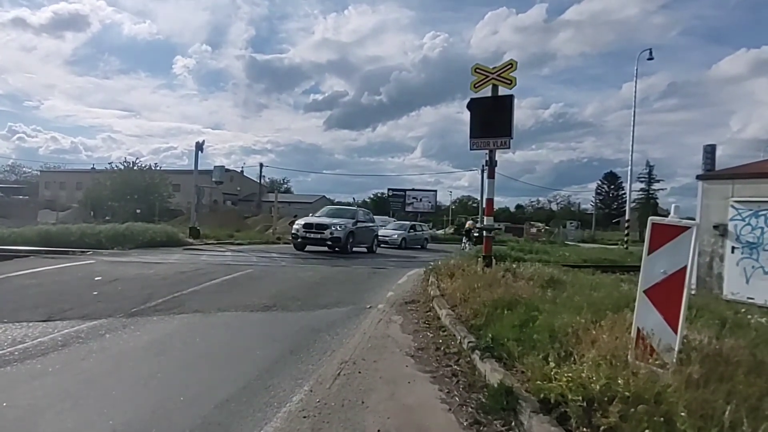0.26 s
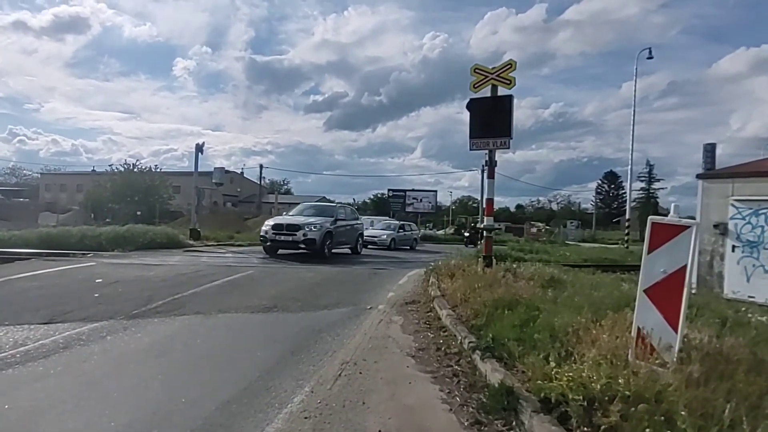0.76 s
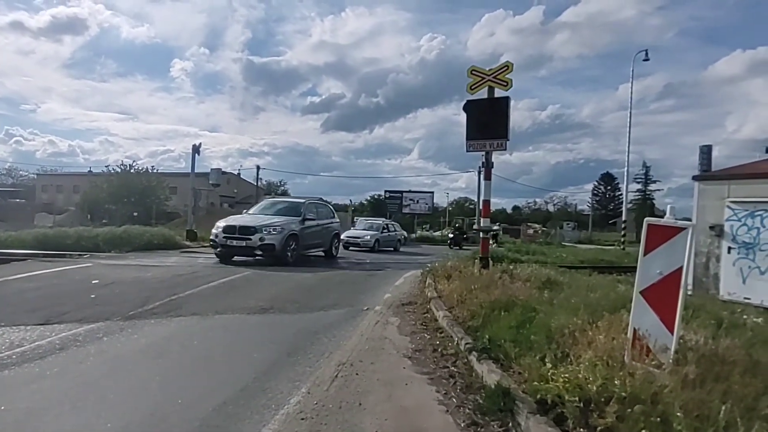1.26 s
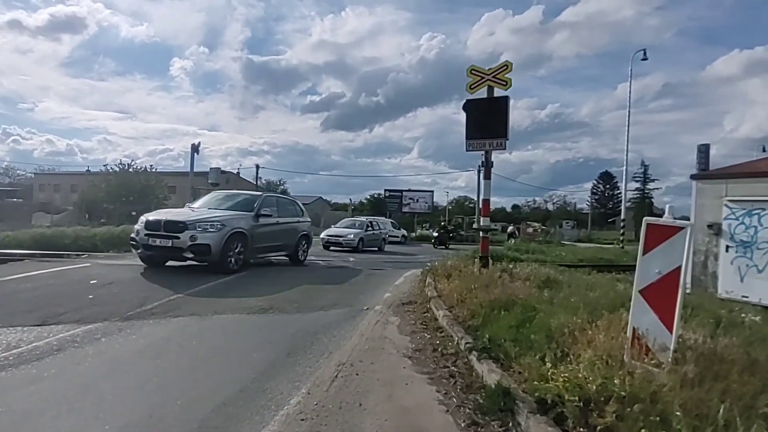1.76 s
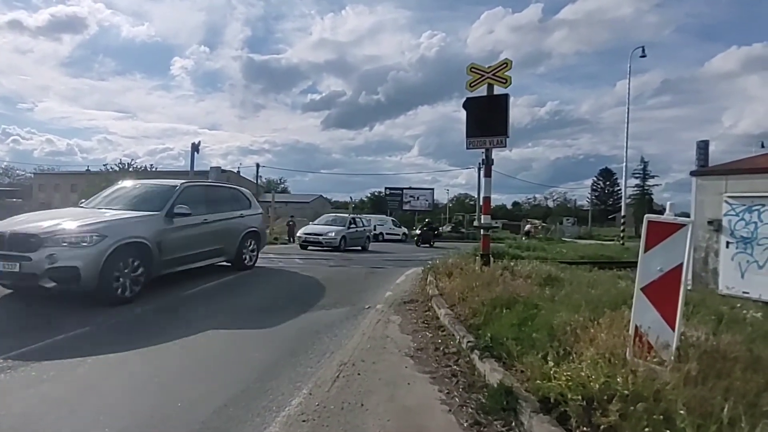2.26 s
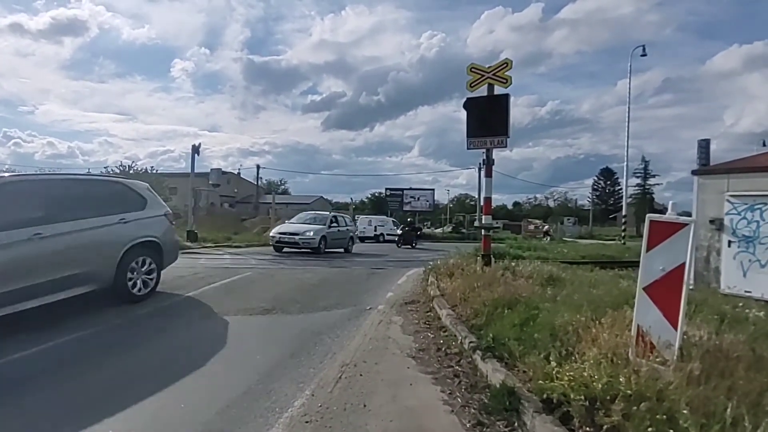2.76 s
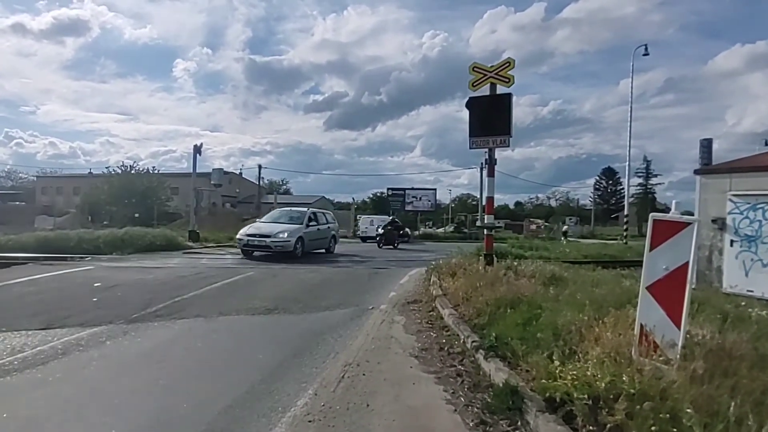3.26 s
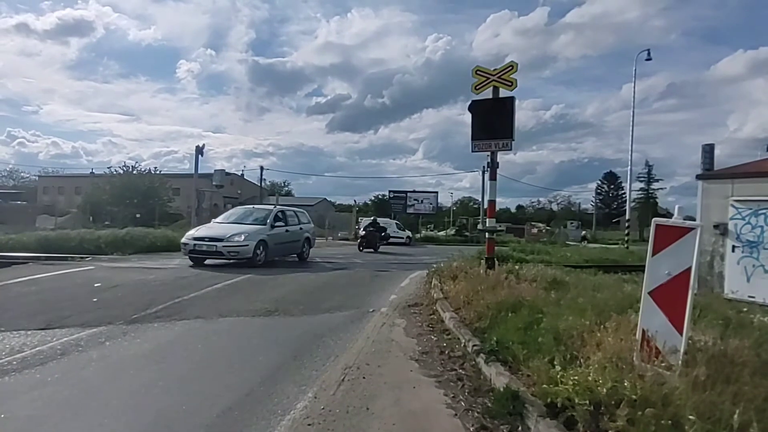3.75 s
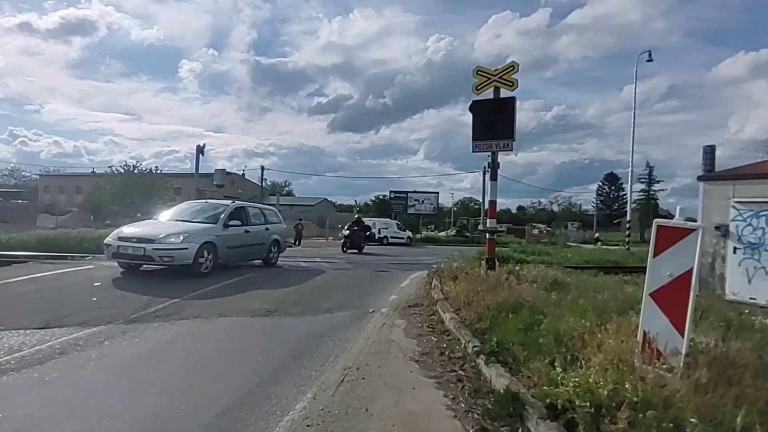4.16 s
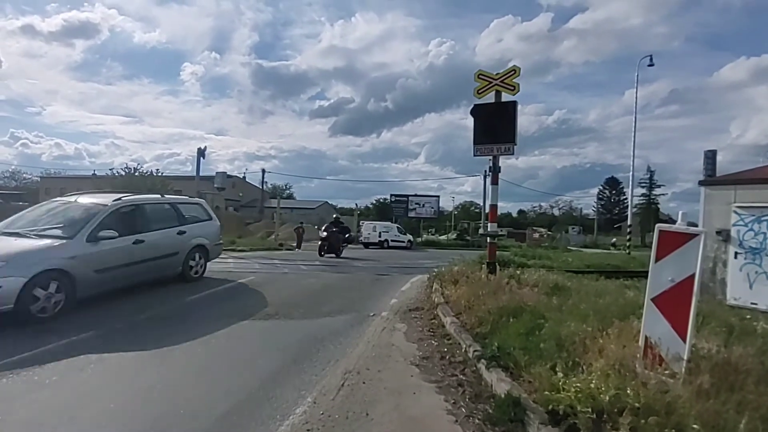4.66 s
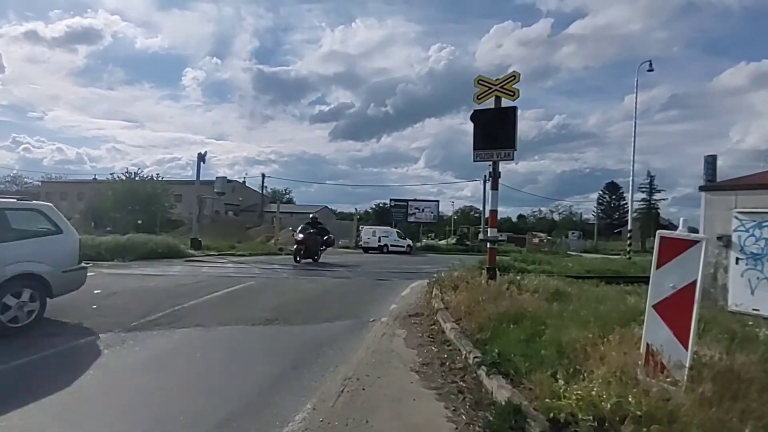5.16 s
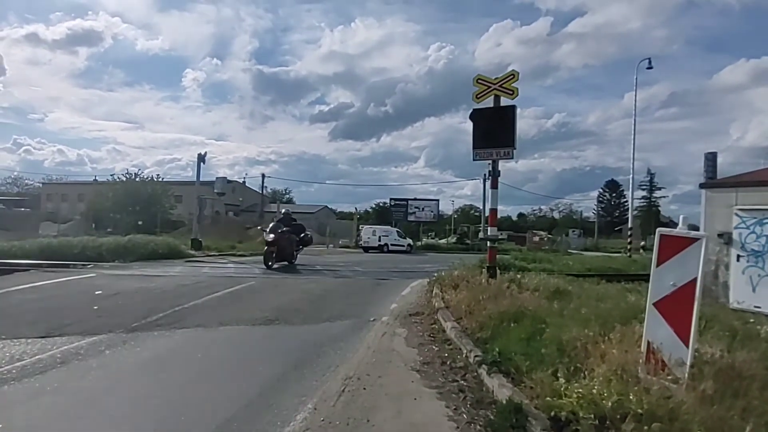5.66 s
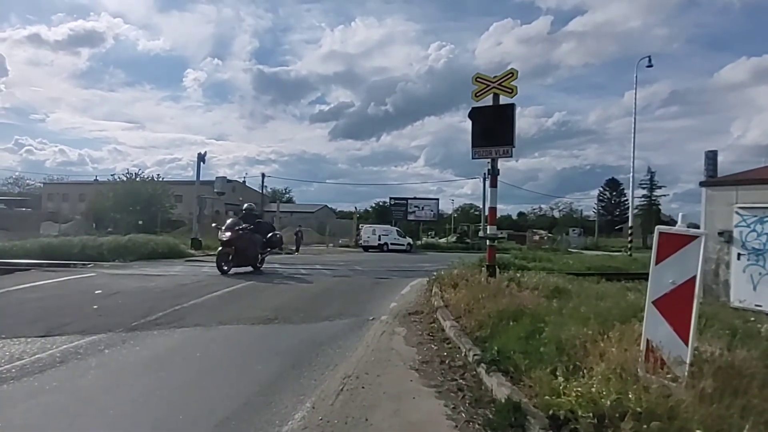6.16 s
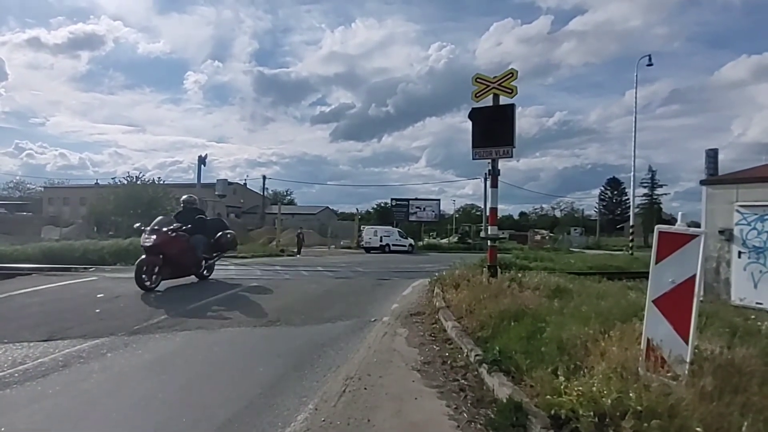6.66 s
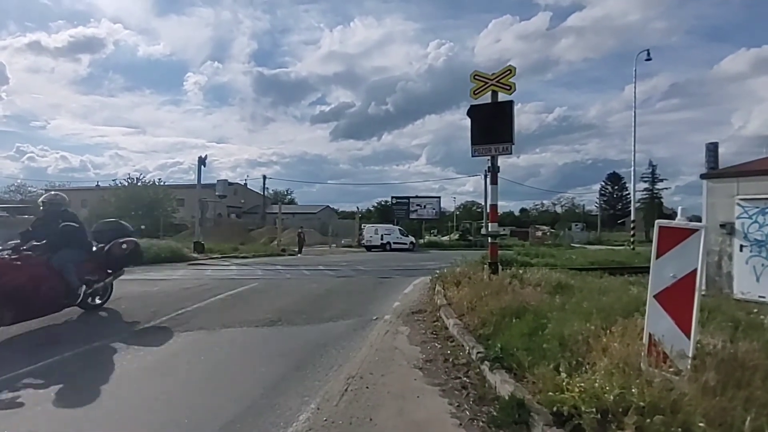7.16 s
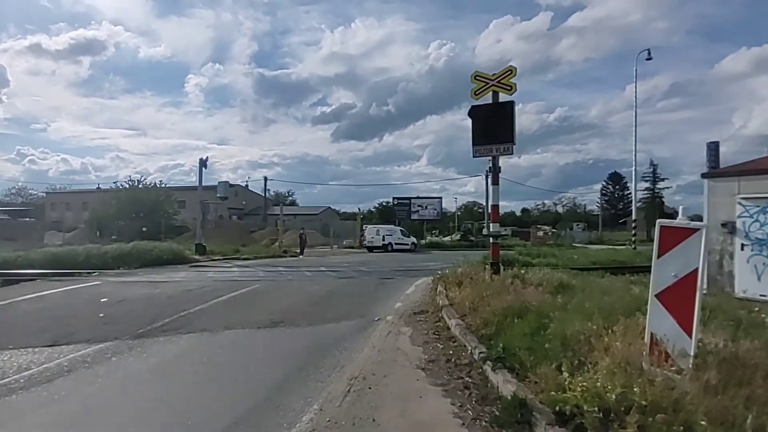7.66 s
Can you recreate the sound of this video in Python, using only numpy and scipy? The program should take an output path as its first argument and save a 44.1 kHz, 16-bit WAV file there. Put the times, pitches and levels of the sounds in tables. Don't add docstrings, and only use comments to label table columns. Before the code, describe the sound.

At an outdoor roadside, two cars then a motorcycle sweep past with rushing tyres, low rumble, rising engine drone and short wheel thumps.

```python
import sys
import numpy as np
from scipy import signal
from scipy.io import wavfile
from scipy.ndimage import uniform_filter1d, map_coordinates

SR = 44100
rng = np.random.default_rng(int(sys.argv[2]) if len(sys.argv) > 2 else 0)


def file_out(sig):
    cols = np.atleast_2d(sig).T
    lim = np.clip(cols, -1, 1)
    pcm = np.round(lim * 32767).astype(np.int16)
    wavfile.write(sys.argv[1], SR, pcm)


def elevation(decibels):
    levels = np.asarray(decibels, float)
    return 10 ** (levels / 20)


N = 347949

# time in seconds, level in dB,
# bearing (0 far ahead, 1 nearing, 2 abreast, 3 low on the left).
CAR_ONE_TYRES = [(0, -45, 0.29), (1, -40, 0.042), (1.7, -33.5, 0.49), (3.05, -30.5, 1.09),
                 (3.4, -30.5, 1.87), (3.8, -30, 1.84), (4.7, -33, 2.05), (5.1, -34.5, 1.95),
                 (5.9, -57, 2.1)]
CAR_TWO_TYRES = [(3.4, -56, .35), (4, -39.5, 0.34), (4.4, -32.5, 0.75), (5.1, -33.5, 1.26),
                 (5.5, -31, 1.93), (6.05, -30.5, 1.99), (6.68, -34.5, 1.75), (6.76, -35, 0.51),
                 (7.2, -43, 0.78)]
BIKE_TYRES = [(5.8, -50, 3), (6.3, -40.5, 2.76), (6.7, -35, 2.35), (7.05, -35, 2.86), (7.35, -35, 3),
              (7.65, -34, 2.84), (7.89, -36, 4.2)]
# time the lobe starts to climb in seconds, lobe in dB, treble in dB,
# rumble over the tyres in dB, deep rumble in dB.
VEHICLE_TRAITS = [
    (1.72, 3, -2.5, -1, -2),
    (3.7, 4.5, 2.5, 0.5, -1.5),
    (6.55, 8.5, -3.5, 2, 6),
]
LOBE_WIDTHS = [.16, .18, .1]
SHADOW_DEPTHS_DB = [2, 2, 7]
# vehicle number from 0, time in seconds, width in seconds, treble in dB.
TREAD_FLARES = [
    (0, 3.7, 0.16, 3.5),
    (0, 4.65, 0.24, 4),
    (1, 6.03, .11, 6.5),
]
# bearing, centre in Hz, depth in dB.
GROUND_DIP = [(0, 630, 6), (.5, 670, 13.5), (.8, 708, 10), (1, 751, 4), (2, 740, 2), (3, 711, -0.5)]

# frequency in Hz, left in dB,
# right in dB, extra phase in radians, likeness from 0 to 1.
AHEAD_BODY = [(440, 11.5, 12, 2, 0.99), (630, -3, 2.5, 1, 1), (800, 11, 10.5, -2.5, 0.84),
              (1130, 5.5, 9.5, -1.7, 0.99), (1290, -1, 6.5, -1.9, 0.63), (1530, 11.5, 6.5, -2, 0.98),
              (1790, -4.5, -1, -2, 0.17), (2010, -2, -2, -1, 0.53), (2340, -8, -14, -2.3, 0.81),
              (2520, -5.5, -6, 1.5, .3), (2840, 1, 3, 1, 0.96), (3140, 3, -3.5, 0.8, 1),
              (3430, -12, -37, 3.5, .3), (3780, -26, -28.5, 0.5, .15)]
NEARING_BODY = [(246, 18.5, 15.5, -.4, 0.99), (475, 9, 11.5, 0.5, 0.93), (696, 3.5, 9.5, 0.5, 0.93),
                (875, 8, 4, -1.25, 0.82), (1145, 4.5, 10, -1.04, 1), (1540, 0.5, 6.5, 0, 0.98),
                (1830, 2.5, 2, -3.2, 0.48), (1990, -6, 7.5, 1.2, 0.11), (2360, -4, 0.5, -5, 0.67),
                (2920, -4, -7.5, 2, 0.4), (3116, -3, -5, 2.5, 0.4), (3610, -14, -24, 11.5, 0.22),
                (4170, -21, -16.5, -1.5, 0.27), (5050, -31.1, -21, 5, 0.08)]
ABREAST_BODY = [(248, 11.5, 8, 0.25, 0.65), (443, 9.5, 10, -0.097, 0.9), (670, 8.5, 9, 0.046, 0.8),
                (910, 7.5, 10, -0.77, 0.9), (1120, 5.5, 10, -0.57, 0.5), (1530, 4.5, 5, 0.54, 0.45),
                (1830, 6.5, 6, 0.35, 0.99), (1950, 0.5, 1.5, -0.39, 0.54), (2340, -2, 7.5, -0.094, 0.37),
                (2750, 4.5, 4.5, 0.49, 0.99), (3060, 10, 3, 1, 0.81), (3530, -3.5, 2.5, -0.87, 0.42),
                (4020, -7.5, -7.5, -0.29, 0.81), (4860, -56, -21, -1.4, 0.1)]
LEFT_BODY = [(250.0, 18.5, 16, -0.26, 0.99), (462, 13.5, 15.5, -1, 0.81), (680, 2, 3, 0.26, 0.47),
             (940, 10, 6.5, -0.05, 0.94), (1154, 5.5, 7.5, -0.3, 0.35), (1560, 4, -1, 0.96, 1),
             (1820, 1.5, -2, 1.3, 0.52), (2090, -4, 1, -0.43, 0.46), (2384, 0, -3, -0.29, 0.38),
             (2800.0, 0.5, -5.5, 2.4, 0.28), (3330, 0.5, -8.2, 1.1, 0.2), (3520, -5.5, -22, -1, 0.205),
             (4400, -15.5, -21, -0.73, 0.45), (5000.0, -23, -28.4, -0.85, 0.14)]
# frequency in Hz, left in dB, right in dB.
AHEAD_TREBLE = [(4500.0, -23, -23), (5500.0, -32, -28), (6500.0, -33, -23), (8100, -32, -33),
                (9700.0, -44, -33), (11500.0, -34, -34), (13500.0, -35.1, -39), (15400.0, -34, -34)]
NEARING_TREBLE = [(4500.0, -22.9, -20.5), (5400, -30, -22.5), (6660, -28.5, -29.5), (8700, -22.5, -27.5),
                  (9400, -37, -31), (11500.0, -28, -30), (13500.0, -28, -34), (15400.0, -33, -31)]
ABREAST_TREBLE = [(4400, -23.8, -14), (5360, -56, -21), (6630, -43.5, -22), (8350, -32, -24.5),
                  (9700.0, -55, -24), (11900, -37, -28.5), (13500.0, -30.0, -30), (15400.0, -40.3, -27.0)]
LEFT_TREBLE = [(4530, -16, -24), (5400, -23, -34), (6500.0, -17.5, -28), (8270, -15, -38), (9500, -25, -38),
               (11700, -20, -43), (13500.0, -19, -40), (15400.0, -20, -40.6)]

# frequency in Hz, density in dB per Hz.
RUMBLE_COLOUR = [(20, -42), (40, -17), (55, -5), (80, 17), (130, 12), (220, 15.5), (300, 12), (420, -53.5)]

# time in seconds, firing rate in Hz, level in dB rms.
CAR_ONE_ENGINE = [(0, 84.6, -42), (.25, 81.2, -39), (.5, 75.2, -55), (.8, 82.25, -41), (1.5, 93.23, -38),
                  (1.9, 97.8, -39.5), (2.4, 99.5, -42.5), (4, 100.6, -52), (4.6, 102.5, -62)]
CAR_TWO_ENGINE = [(2.8, 51.9, -55), (3.65, 61.4, -47), (4.2, 68.17, -35.5), (4.5, 69.65, -36),
                  (5.13, 74.8, -29), (5.4, 80.15, -32), (6, 82, -37), (6.3, 80.7, -37.5), (6.6, 81.6, -48)]
BIKE_ENGINE = [(4.2, 45.47, -44), (5.3, 47.38, -33), (6, 49.9, -30), (6.55, 53.58, -27.5), (7.0, 58.2, -26),
               (7.42, 62.2, -27), (7.52, 62.8, -32.5), (7.63, 68.63, -25.5), (7.89, 66.2, -25)]
FOLLOWING_ENGINE = [(6.9, 80, -63), (7.15, 83.2, -32), (7.35, 82.7, -24), (7.5, 81.3, -28),
                    (7.65, 84.4, -23.5), (7.8, 88.9, -24.5), (7.89, 86.6, -20)]
CAR_ONE_GEARBOX = [(2.5, 95.6, -65.5), (2.8, 96.9, -51), (2.95, 97, -47), (3.15, 101.4, -40.5),
                   (3.3, 100.8, -40.5), (3.5, 97.6, -48.5), (3.72, 93.7, -46.5), (3.85, 93, -67)]
# multiple of the firing rate, level over the engine in dB,
# growth in dB per octave of revs.
CAR_ONE_ORDERS = [(1, -2, 3), (2, -7, 43)]
CAR_TWO_ORDERS = [(1, -1, 21), (2, -2, -2), (3, -4.5, -26.5), (4, -9.5, -4), (5, -25.5, -39), (6, -15, -22)]
BIKE_ORDERS = [(1, -11.5, 48), (2, -3, -12), (2.985, -19.5, 59), (4.017, -11, -18), (4.999, -18.5, -12),
               (8.02, -24, 3), (28, -23.5, 20)]
GEARBOX_ORDERS = [(4, -4, 0), (5.8, 0.5, 0), (6.25, -4, 0), (6.6, 0.5, 1)]
# centre in Hz, width in log Hz, gain in dB.
CAR_TWO_PIPE = [(394.4, 0.051, 17.6)]
BIKE_PIPE = [(114, 0.11, 3.4), (224, 0.088, 5.1), (261.3, 0.023, 8.9), (470.5, 0.037, 12.4)]

# time in seconds, peak in dB, pitch in Hz, 60 dB decay in seconds.
WHEEL_THUDS = [
    (.281, -22.5, 114, 0.1),
    (1.08, -28.5, 890, .01),
    (2.271, -15, 900, 0.011),
    (3.999, -12.5, 940, 0.017),
    (4.39, -22, 500, 0.012),
    (6.864, -15, 390, 0.04),
]
# line in Hz, level in dB rms.
VAN_IDLE = [(165, -51.5), (207, -54)]
# start in seconds, end in seconds, first pitch in Hz, last pitch in Hz, level in dB.
BIRD_PEEP = (0.118, 0.146, 5800, 6800, -74)
# time in seconds, peak in dB.
HANDLING_TICKS = [(.095, -58), (.402, -58)]

HOP, WIN = 256, 1024
LOBE_LOW_HZ, LOBE_HIGH_HZ, LOBE_OCT_PER_S = 1140, 3100, 0.7
TREBLE_LOSS_DB_PER_S = 0.5
SHADOW_BELOW = 0.18
LAG_S = 14 / SR
LONG_WAVE_HZ, LONG_WAVE_LAG_S = 560, 3 / SR
FAR_RUMBLE_DB, FAR_DEEP_DB = -59, 11
DEEP_HZ, DEEP_WIDTH = 77, 1


def tyres(count, rows):
    hz, t, (a, b) = patchy_noise(patchy_db=0.83, gust_db=1.1)
    f = hz[:, None]
    level_db, bearing = columns(rows, t)
    bearing = np.clip(bearing, 0, 3 - 1e-6)
    climb_s, peak_db, treble_db = VEHICLE_TRAITS[count][:3]
    lobe_width = LOBE_WIDTHS[count]

    octaves = LOBE_OCT_PER_S * (t - climb_s)
    span = np.log2(LOBE_HIGH_HZ / LOBE_LOW_HZ)
    peak_hz = LOBE_LOW_HZ * 2 ** np.clip(octaves, 0, span)
    lobe_in = np.clip(octaves + .5, 0, 1)
    hidden_s = np.clip(octaves - span, 0, 9) / LOBE_OCT_PER_S
    treble_db = treble_db - TREBLE_LOSS_DB_PER_S * hidden_s
    for who, s, width, db in TREAD_FLARES:
        if round(who) == count:
            treble_db += db * bump(t, s, width)

    lower, part = bearing.astype(int), (bearing % 1)[:, None, None]
    views = pair_response(hz)
    view = views[lower] * (1 - part) + views[lower + 1] * part
    left_db, right_db, extra, alike = np.transpose(view, (1, 2, 0))
    right_db = right_db + peak_db * bump(np.log(f), np.log(peak_hz), lobe_width) * lobe_in

    shared_db = level_db + 3.0 + fade_db(rows, t)
    shared_db = shared_db + treble_db * np.clip((f - 3800) / 1200, 0, 1)
    shared_db -= 40 * np.clip(np.log2(330 / f), 0, 3)
    dip_hz, dip_db = columns(GROUND_DIP, bearing)
    shared_db -= dip_db * bump(np.log(f), np.log(dip_hz), 0.13)
    shared_db -= SHADOW_DEPTHS_DB[count] * bump(np.log(f / peak_hz), -SHADOW_BELOW, lobe_width) * lobe_in

    short = np.clip((f - LONG_WAVE_HZ) / 80, 0, 1)
    short_phase = extra + 2 * np.pi * f * LAG_S
    long_phase = 2 * np.pi * f * LONG_WAVE_LAG_S
    spin = np.exp(.5j * (short * short_phase + (1 - short) * long_phase))
    turn = np.arccos(np.clip(alike, 0, 1)) / 2
    left = elevation(left_db + shared_db) * spin * (np.cos(turn) * a + np.sin(turn) * b)
    right = elevation(right_db + shared_db) / spin * (np.cos(turn) * a - np.sin(turn) * b)
    return to_sound(np.array([left, right]))


def pair_response(hz):
    views = []
    high = hz > 4500
    for body, treble in [(AHEAD_BODY, AHEAD_TREBLE), (NEARING_BODY, NEARING_TREBLE),
                         (ABREAST_BODY, ABREAST_TREBLE), (LEFT_BODY, LEFT_TREBLE)]:
        view = columns(body, hz, np.log)
        view[:2, high] = columns(treble, hz[high], np.log)
        view[3, high] *= .5
        views.append(view)
    return np.array(views)


def rumble():
    hz, t, (a, b) = patchy_noise(patchy_db=1.5, gust_db=1.5)
    deep = bump(np.log(hz[:, None]), np.log(DEEP_HZ), DEEP_WIDTH)
    power = elevation(FAR_RUMBLE_DB + FAR_DEEP_DB * deep) ** 2
    for rows, (*_, over_db, deep_db) in zip([CAR_ONE_TYRES, CAR_TWO_TYRES, BIKE_TYRES], VEHICLE_TRAITS):
        body_db = columns(rows, t)[0] + fade_db(rows, t) + over_db
        power = power + elevation(body_db + deep_db * deep) ** 2
    colour = elevation(columns(RUMBLE_COLOUR, hz, np.log)[0])[:, None]
    colour = colour / np.sqrt(np.mean(colour ** 2))
    pair = np.array([a + 0.15 * b, 1.054 * (a - 0.046 * b)])
    return to_sound(pair * colour * np.sqrt(power))


def engine(rows, orders, drift, flutter_db, pipe=()):
    t = np.arange(N) / SR
    hz, level_db = columns(rows, t)
    revs = np.log2(hz / np.mean(np.transpose(rows)[1]))
    phase = 2 * np.pi * np.cumsum(hz * (1 + drift * wobble(14))) / SR
    out = 0
    for k, db, growth_db in orders:
        ring_db = 0
        for centre, width, gain_db in pipe:
            ring_db = ring_db + gain_db * bump(np.log(k * hz), np.log(centre), width)
        order_db = db + growth_db * revs + ring_db + flutter_db * wobble(9)
        out += elevation(order_db) * np.sin(k * phase + rng.uniform(0, 2 * np.pi))
    return out * elevation(level_db + 0.5 + fade_db(rows, t))


def engines():
    out = engine(CAR_ONE_ENGINE, CAR_ONE_ORDERS, drift=0.0085, flutter_db=-1.0)
    out += engine(CAR_TWO_ENGINE, CAR_TWO_ORDERS, drift=0.00734, flutter_db=2.5, pipe=CAR_TWO_PIPE)
    out += engine(BIKE_ENGINE, BIKE_ORDERS, drift=0.00707, flutter_db=2.0, pipe=BIKE_PIPE)
    out += engine(FOLLOWING_ENGINE, CAR_ONE_ORDERS[:1], drift=0.022, flutter_db=3.5)
    out += engine(CAR_ONE_GEARBOX, GEARBOX_ORDERS, drift=0.0054, flutter_db=4.5)
    return out


def wheel_thuds():
    out, t = np.zeros(N + SR), np.arange(SR // 4) / SR
    for s, db, hz, t60 in WHEEL_THUDS:
        onset = 1 - np.exp(-t * hz * 0.8)
        swing = elevation(db + 1.0 - 60 * t / t60) * onset * np.sin(2 * np.pi * hz * t)
        out[round(s * SR):][:len(t)] += swing
    return out[:N]


def idling_van():
    t = np.arange(N) / SR
    out = np.zeros(N)
    for hz, db in VAN_IDLE:
        line_db = db + 1.0 + 2.2 * wobble(4.16) - 4.6 * np.clip(t - 3.2, 0, 9)
        out += elevation(line_db) * np.sin(2 * np.pi * hz * t)
    return out


def bird_peep():
    start, end, from_hz, to_hz, db = BIRD_PEEP
    u = np.clip((np.arange(N) / SR - start) / (end - start), 0, 1)
    phase = 2 * np.pi * np.cumsum(from_hz + (to_hz - from_hz) * u) / SR
    return elevation(db + 7) * np.sin(np.pi * u) * np.sin(phase)


def handling_ticks():
    out, t = np.zeros(N), np.arange(200) / SR
    for s, db in HANDLING_TICKS:
        bright = np.diff(rng.standard_normal(202), n=2)
        out[round(s * SR):][:200] += elevation(db - 11 - 60 * t / .004) * bright
    return out


def patchy_noise(patchy_db, gust_db):
    hz, t, z = signal.stft(rng.standard_normal((2, N)), SR, nperseg=WIN, noverlap=WIN - HOP)
    field = uniform_filter1d(rng.standard_normal(z.shape[1:]), size=10, axis=0)
    field = unit(uniform_filter1d(field, size=12, axis=1))
    gust = unit(uniform_filter1d(rng.standard_normal(len(t)), size=6))
    patches = patchy_db * field * (1 + hz[:, None] / 9000)
    gusts = gust_db * gust * np.clip(hz[:, None] / 8000, .2, 1)
    return hz + 1, t, z * elevation(patches + gusts)


def to_sound(z):
    return signal.istft(z, SR, nperseg=WIN, noverlap=WIN - HOP)[1][:, :N]


def fade_db(rows, t):
    early = np.clip(rows[0][0] - .05 - t, 0, 1)
    late = np.clip(t - rows[-1][0] - .05, 0, 1)
    return -200 * (early + late)


def columns(rows, at, scale=lambda v: v):
    key, *cols = np.transpose(rows)
    return np.array([np.interp(scale(at), scale(key), c) for c in cols])


def wobble(rate):
    knots = rng.standard_normal(int(N * rate / SR) + 4)
    return map_coordinates(knots, [np.arange(N) * rate / SR])


def bump(x, centre, width):
    return np.exp(-((x - centre) / width) ** 2)


def unit(x):
    return x / np.sqrt(np.mean(x ** 2) + 1e-20)


def scene():
    roar = tyres(0, CAR_ONE_TYRES) + tyres(1, CAR_TWO_TYRES) + tyres(2, BIKE_TYRES)
    near = engines() + wheel_thuds() + idling_van() + bird_peep() + handling_ticks()
    late = np.pad(near, (9, 0))[:N]
    return roar + rumble() + np.array([near * elevation(1.3), late * elevation(1.5)])


def band_limit(x):
    return signal.sosfilt(signal.butter(12, 15530, fs=SR, output="sos"), x)


def record(dry):
    fade = np.clip(np.arange(N)[::-1] / SR / .004, 0, 1)
    return band_limit(dry * fade)


dry = scene()
out = record(dry)
file_out(out)
```